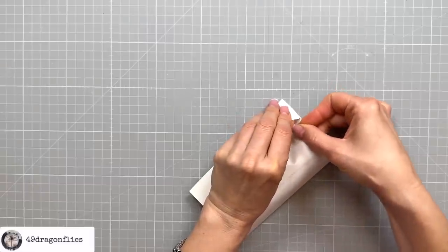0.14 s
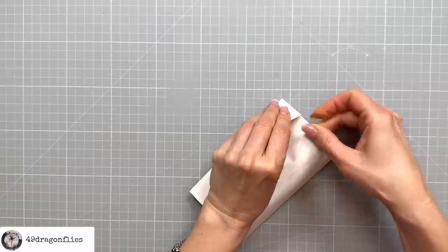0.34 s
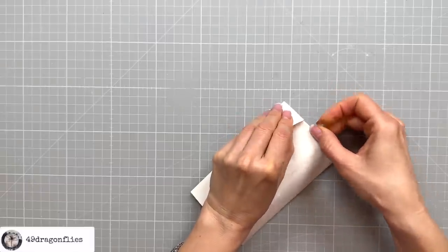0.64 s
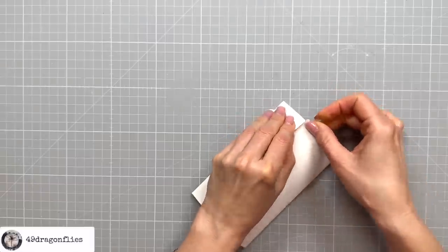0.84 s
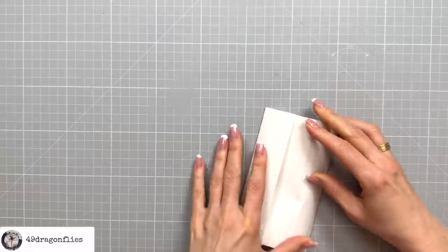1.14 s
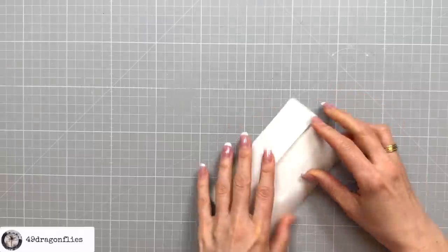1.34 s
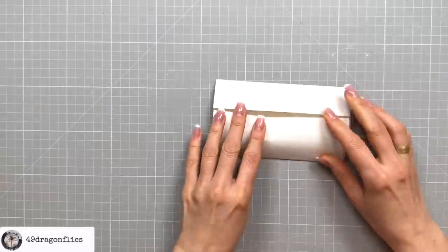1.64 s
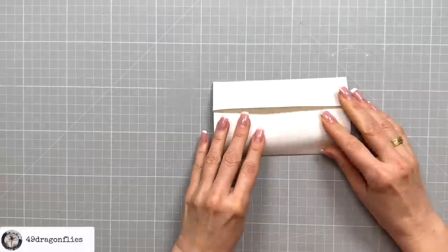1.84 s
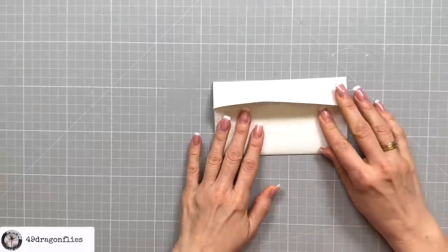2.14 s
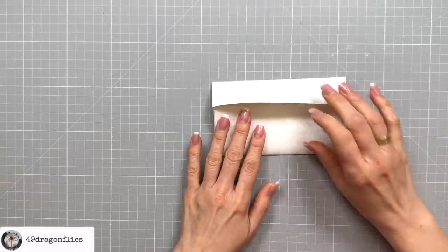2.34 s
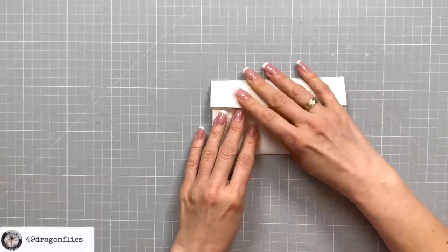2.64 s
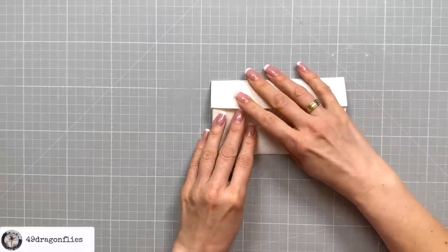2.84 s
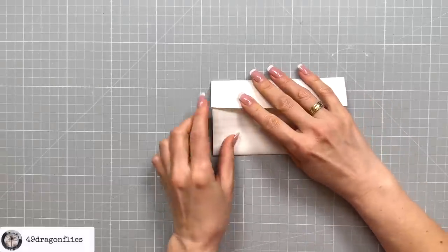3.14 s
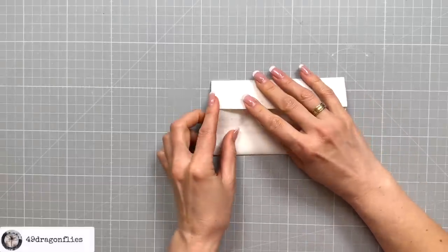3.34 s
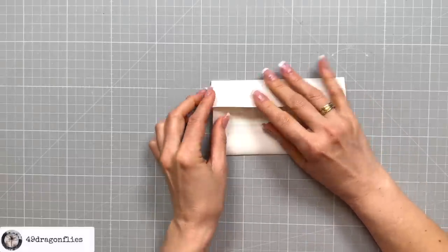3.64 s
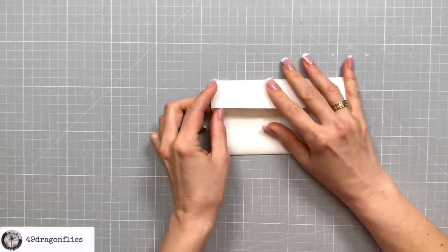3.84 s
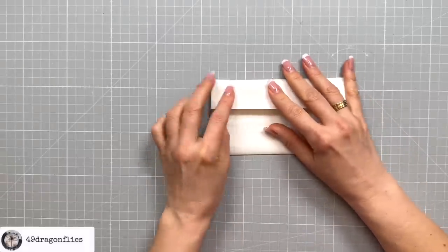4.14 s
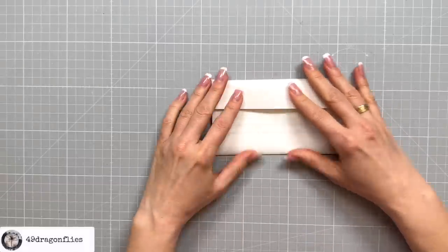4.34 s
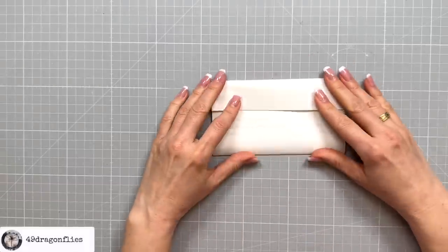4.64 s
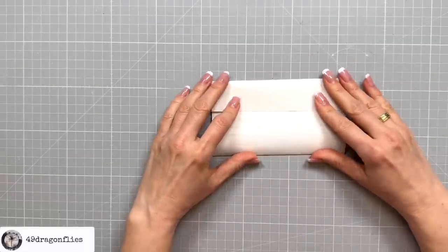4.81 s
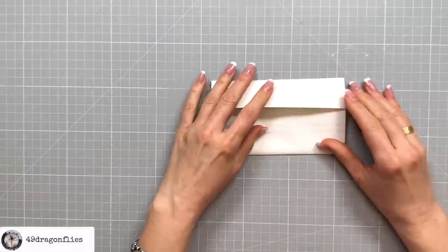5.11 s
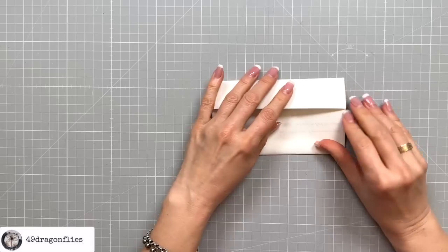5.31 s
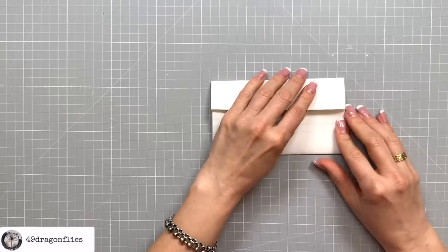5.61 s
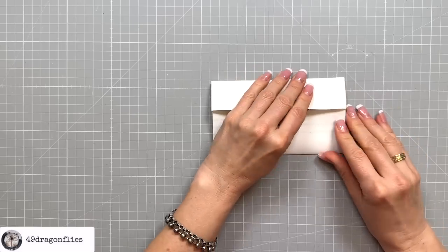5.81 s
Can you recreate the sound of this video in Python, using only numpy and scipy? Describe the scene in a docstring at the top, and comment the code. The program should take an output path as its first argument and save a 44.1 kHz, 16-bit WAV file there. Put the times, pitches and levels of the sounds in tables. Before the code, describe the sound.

Hands fold and smooth paper on a desk, with soft rustling, rubbing and sharp little crackles in a quiet room.

```python
"""Folding paper on a desk

Hands fold and slide a sheet on a desk mat under a phone, in a quiet room. Rubbing is a dense
shower of fibre slips that hisses in the sheet, rings the desk and at times squeaks. Creases
snap in short bursts with an early echo and a small room tail. Hands bump the desk softly."""
import sys
import numpy as np
from scipy import signal
from scipy.fft import rfft, irfft
from scipy.io import wavfile
from scipy.ndimage import uniform_filter1d

SR = 44100
rng = np.random.default_rng(int(sys.argv[2]) if len(sys.argv) > 2 else 0)


def pcm_store(signal):
    """Save signal as 16-bit PCM."""
    levels = np.round(np.clip(np.atleast_2d(signal), -1, 1) * 32767)
    wavfile.write(sys.argv[1], SR, levels.astype(np.int16).T)


N = 263277


def undb(db):
    return 10 ** (np.asarray(db) / 20)


def unit(x):
    return x / np.sqrt(np.mean(x ** 2))


def per_bin(points):
    """(Hz, value) points interpolated over log frequency at every FFT bin."""
    hz, values = np.transpose(points)
    return np.interp(np.log(np.fft.rfftfreq(N, 1 / SR) + 1), np.log(hz), values)


def colour(x, points):
    """Filter by a (Hz, dB) curve."""
    return irfft(rfft(x) * undb(per_bin(points)), N)


def band(x, hz, width_hz):
    """One resonance, gain 1 at its centre."""
    return signal.lfilter(*signal.iirpeak(min(hz, .45 * SR), hz / width_hz, SR), x)


def walk(rate_hz):
    """Random levels joined by ramps; spread near 1."""
    step = int(SR / rate_hz)
    return 0.97 * uniform_filter1d(np.repeat(rng.standard_normal(N // step + 1), step), step)[:N]


def swell_db(start_s, rise_s, hold_s, fall_s):
    """0 dB from start_s for hold_s; slopes of 20 dB per rise_s before and per fall_s after."""
    t = np.arange(N) / SR
    before = (start_s - t) / max(rise_s, .003)
    after = (t - start_s - hold_s) / max(fall_s, .003)
    return -20 * np.maximum(np.maximum(before, after), 0)


def rubbing(sheet_gain, desk_gain, hiss_gain, airy_gain):
    """The same fibre slips drive sheet rustle, desk ring, fine hiss, airy top and squeaks."""
    # Spectra of rustle, hiss and airy top. Each row: frequency in Hz, relative density in dB.
    sheet_spectrum = [(700, -55.5), (1200, 7), (2000, 2.5), (2500, 0.5), (3200, 2), (4200, 0),
                      (6500, -19.5)]
    hiss_spectrum = [(3200, -26), (4600, -7), (5400, -3.5), (6500, 1), (7300, -0.5), (8400, -3),
                     (11000, -13.5)]
    airy_spectrum = [(7500, -26), (9500, -10.5), (11000, -14.5), (15500, -13.5)]
    grain = 1.4 + unit(fibre_slips(rate_hz=380, spread_db=7, fade_ms=7.4))
    drive = grain * rng.standard_normal((2, N))
    desk = desk_ring(drive)
    squeaks = rubbing_squeaks(drive)
    bent = unit(drive) + undb(7) * unit(bent_sheet(drive))
    sheet = undb(0.75 * walk(33)) * colour(bent, sheet_spectrum)
    hiss = undb(1.8 * walk(35)) * colour(bent, hiss_spectrum)
    airy = colour(drive, airy_spectrum)
    return (sheet_gain * unit(sheet) + desk_gain * unit(desk) + hiss_gain * unit(hiss)
            + airy_gain * unit(airy) + squeaks)


def fibre_slips(rate_hz, spread_db, fade_ms):
    """Slip envelope: sudden starts, quick fades, a few larger than the rest."""
    onsets = rng.random(N) < rate_hz / SR
    sizes = undb(spread_db * np.minimum(rng.exponential(size=N), 3))
    return signal.lfilter([1], [1, -np.exp(-1000 / (fade_ms * SR))], onsets * sizes)


def stroke_gains():
    """Gains of sheet, desk, hiss and airy top; strokes add in power."""
    # Strokes of paper and fingers. Each row: start of full level, rise, hold and fall in seconds,
    # then sheet, desk, hiss and airy levels in dB.
    strokes = [(0.206, 0.046, 0.089, 0.14, -48, -53, -48.5, -77),
               (0.436, 0.003, 0.0048, 0.054, -61, -43.5, -44, -93.5),
               (0.545, 0.033, 0.056, 0.18, -44, -64, -42, -47),
               (0.671, 0.18, 0.086, 0.16, -41.5, -38, -37.5, -45),
               (0.887, 0.11, 0.043, 0.066, -49, -50, -49, -54),
               (1.026, 0.22, 0.1, 0.055, -51.5, -61.5, -51.5, -52),
               (1.182, .02, 0.08, 0.074, -49, -77, -56, -53.5),
               (1.288, 0.011, 0.1, 0.061, -41, -70, -42, -41.5),
               (1.349, 0.095, 0.053, 0.19, -39, -46, -37.5, -36.5),
               (1.508, 0.08, 0.13, 0.11, -52.5, -79, -54.5, -55.5),
               (1.663, 0.016, 0.043, 0.085, -45, -58, -45.5, -50),
               (1.913, 0.17, 0.019, 0.039, -50, -57, -51.5, -62),
               (2.021, 0.069, 0.04, 0.11, -40, -51.5, -38.5, -70.5),
               (2.203, .04, 0.052, 0.095, -55, -79, -57, -59),
               (2.569, 0.053, 0.11, 0.073, -56, -64.5, -58, -82),
               (2.732, 0.061, 0.047, 0.063, -53.5, -80, -53, -64),
               (2.85, 0.03, 0.18, 0.087, -59.5, -73, -56.5, -60),
               (3.066, 0.037, 0.045, 0.22, -53.5, -52.5, -55.5, -70),
               (3.368, 0.19, 0.033, 0.079, -59.5, -62.5, -56, -79),
               (3.613, 0.048, 0.093, 0.087, -49, -52.5, -54.5, -55),
               (3.754, 0.08, 0.073, 0.24, -49.5, -61, -54, -63),
               (4.003, 0.044, 0.024, 0.091, -52.5, -57.5, -53.5, -82),
               (4.283, 0.39, 0.066, 0.09, -50, -52.5, -52.5, -45.5),
               (4.432, 0.12, 0.032, 0.23, -55.5, -94, -55, -54),
               (4.629, 0.14, 0.039, 0.081, -48, -63, -54.5, -57),
               (4.803, 0.011, 0.076, 0.18, -60.5, -59, -64, -56),
               (5.05, 0.2, 0.046, 0.4, -53, -51.5, -55, -53.5),
               (5.192, 0.11, 0.11, 0.1, -49.5, -51, -48, -55),
               (5.399, 0.12, 0.21, 0.13, -52, -49.5, -53.5, -54),
               (5.69, 0.035, 0.0086, 0.068, -52, -59, -51, -48.5),
               (5.818, 0.029, 0.026, 0.16, -43.5, -56, -46.5, -47.5)]
    resting_db = np.c_[[-66.5, -80.5, -70, -105]]  # fingers lying still
    power = undb(resting_db) ** 2
    for start_s, rise_s, hold_s, fall_s, *levels_db in strokes:
        envelope = undb(swell_db(start_s, rise_s, hold_s, fall_s))
        # The airy top needs speed, so it comes and goes faster.
        envelopes = np.array([envelope, envelope, envelope, envelope ** 2])
        power = power + (undb(np.c_[levels_db]) * envelopes) ** 2
    return np.sqrt(power)


def bent_sheet(drive):
    """Narrow bands come and go; how tightly the sheet is bent sets which are strongest."""
    # Rustle peak. Each row: time in seconds, frequency in Hz.
    bend = [(.4, 1800), (.7, 3960), (.85, 1980), (1.4, 3000), (1.85, 2000), (2.25, 3000), (3.0, 2400),
            (3.1, 4300), (3.4, 2000), (3.6, 3200), (3.82, 2500), (4.45, 3800), (4.65, 2300), (4.9, 4200),
            (5.37, 2300), (5.55, 4000), (5.85, 2300)]
    bend_hz = np.interp(np.arange(N) / SR, *np.transpose(bend))
    out = np.zeros((2, N))
    for hz in 1400 * 1.105 ** np.arange(19):
        octaves_off = np.abs(np.log2(bend_hz / hz))
        out += undb(4 * walk(9) - 10.5 * octaves_off) * band(drive, hz, 0.054 * hz)
    return out


def desk_ring(drive):
    """Where the hand presses sets which desk mode rings most."""
    # Desk modes. Each row: frequency in Hz, width in Hz, relative level in dB.
    modes = [(515, 72, 1), (689.4, 111, 3), (841, 130, 5), (1016, 49, 4)]
    # Favoured pitch. Each row: time in seconds, frequency in Hz.
    press = [(0, 960), (.45, 695), (0.751, 600), (.9, 800), (1.45, 817), (2., 1020), (3.0, 860),
             (4.35, 830), (4.7, 1030), (4.92, 880), (5.05, 765), (5.3, 720), (5.97, 790)]
    press_hz = np.interp(np.arange(N) / SR, *np.transpose(press))
    out = np.zeros((2, N))
    for hz, width_hz, db in modes:
        octaves_off = np.abs(np.log2(press_hz / hz))
        ring = band(band(drive, hz, width_hz), hz, 3 * width_hz) / np.sqrt(width_hz)
        out += undb(db + 3.6 * walk(35) - 23.2 * octaves_off) * ring
    return out


def rubbing_squeaks(drive, width_hz=144):
    """Short pitched squeaks and rings of paper and desk under the rubbing."""
    # Each row: start in seconds, hold in seconds, pitch in Hz, level in dB.
    squeaks = [(0.189, 0.054, 1410, -54), (0.274, 0.051, 1390, -52), (0.525, 0.092, 1380, -41.5),
               (0.635, 0.15, 1060, -43.5), (0.7, 0.12, 1360, -39.5), (1.964, 0.019, 1050, -40.5),
               (2.052, 0.013, 2020, -32), (4.884, 0.06, 890, -55.5), (5.051, 0.022, 1830, -35.5)]
    out = np.zeros((2, N))
    for start_s, hold_s, hz, db in squeaks:
        tone = unit(band(band(drive, hz, width_hz), hz, 3 * width_hz))
        out += undb(db + swell_db(start_s, rise_s=0.006, hold_s=hold_s, fall_s=0.026)) * tone
    return undb(1.3 * walk(65)) * out


def crease_snaps():
    """A crease gives way in a few ms of cracks that ring its own patch of paper."""
    # Each row: start in seconds, ring peak in dB, ring centre in Hz,
    # treble and body in dB relative to the ring, burst length in ms.
    snaps = [(0.051, -46.5, 1830, -36, 8, 1.4), (0.1115, -49, 1390, -29, 6, 6),
             (0.139, -39.5, 3170, -27, -30, 2.2), (0.1522, -36.5, 1430, -41, -4, 1.8),
             (0.214, -29.5, 1400, 3.5, -40, 7.1), (0.2745, -35, 1450, -2, -17, 12.6),
             (0.4388, -30.5, 1300, -49.5, -10, 7.6), (0.5256, -27.5, 1360, -3, -38, 6.8),
             (0.635, -27.5, 1610, 3, -9, 7.4), (0.746, -23.5, 1400, -25, -32, 4.7),
             (0.8152, -28, 1170, -23, 1, 2.73), (0.8794, -39, 1180, -6, 8.5, 2.5),
             (1.0037, -30.5, 1900, -3, -3.5, 3.4), (1.6761, -33, 1830, 1, 0.5, 10),
             (1.8678, -28, 1540, -25, -12, 3.3), (1.955, -19, 1950, -7, -34, 3.5),
             (1.9684, -14, 2370, -58, -19, 8.3), (1.9948, -24, 1960, -18, -32, 0.67),
             (2.0157, -8, 2170, -5, -5.5, 2.6), (2.0672, -16.5, 2490, -19, -32, 2.45),
             (2.0952, -14, 2900, -19, -21, 12.3), (2.1795, -25, 3640, -24, -41, 2.9),
             (2.193, -24, 3840, -24, -39.5, 6.3), (2.206, -26, 2530, -20, -27, 1.9),
             (2.211, -23.5, 3070, -9, -39, 6.9), (2.222, -26.5, 2460, -16, -35, 2.24),
             (2.2291, -26, 2610, -30, -22, 7.2), (2.253, -33.5, 2980, -15, -40, 3.9),
             (2.309, -35, 2880, -19, -26, 3.2), (2.43, -35.5, 2400, -18, -36, 1.4),
             (2.5534, -34.5, 3020, -8, -8, 8.2), (2.5834, -33, 2650, -40, -9, 5.4),
             (2.626, -32, 1690, -20, -8, 4.5), (2.6463, -21, 2500, -20, -21, 1.9),
             (2.7311, -24, 2420, -49, -19, 4.3), (2.7906, -38.5, 1980, 6.5, -33, 1.45),
             (2.8438, -33, 2080, -38, -8, 2.6), (3.0647, -11, 4000, -15, -15, 1.87),
             (3.278, -32.5, 2380, -35, -8, 4.24), (3.317, -37.5, 1580, -36, -59, 4.3),
             (3.373, -40.5, 2500, 1.5, -25, 1.4), (3.3847, -38, 1940, -36, -24, 3.6),
             (3.431, -40.5, 2220, -4.5, -25, 5.1), (3.7736, -23.5, 2630, -6.5, -21, 3.5),
             (3.784, -22, 2640, -32, -21, 1.66), (3.803, -29.5, 2620, -25, -26, 1.35),
             (3.874, -31.5, 2970, -9, -38, 2.6), (3.9352, -25, 2740, -19, -19, 0.77),
             (3.993, -31, 2720, -19, -9, 6.9), (4.0115, -24, 2970, -33, -15, 9.1),
             (4.1037, -34.5, 1810, -18, 3.5, 2.34), (4.618, -30.5, 2090, 2, -8, 2.9),
             (4.6809, -25, 1130, -10.5, -24, 4.64), (4.803, -35, 2900, -4, -4.5, 1.15),
             (4.832, -36.5, 1470, -22, -25, 3), (4.9857, -35, 1940, -6, -2, 3.4),
             (5.051, -10.5, 2150, -19, -13.5, 3.9), (5.0677, -17, 3290, -31, -8.5, 5.3),
             (5.0757, -24, 1730, -24, -10, 1.4), (5.1968, -20, 2470, -44, -4.5, 2.52),
             (5.3474, -25, 2120, -31, -32, 3.4), (5.377, -19, 2210, -11, -48, 1.54),
             (5.704, -38, 2020, -19, -10, 2.5), (5.8103, -11.5, 2900, -22, -24, 1.82),
             (5.841, -11.5, 1760, -49, -11.5, 4.5), (5.923, -20.5, 2950, -26, -42, 1.3)]
    # Modes of the folded sheet. Each row: frequency in Hz, width in Hz, relative level in dB.
    fold_modes = [(1010, 36, 5), (1470, 146, 4), (1846, 330, -1), (2488, 190, 2), (3285, 580, -2),
                  (4210, 610, -5), (6500, 240, 4.5)]
    treble_sos = signal.butter(2, [5000, 11500], "band", fs=SR, output="sos")
    out, t = np.zeros((2, N)), np.arange(SR // 20) / SR
    for start_s, peak_db, hz, treble_db, body_db, burst_ms in snaps:
        progress = 1000 * t / burst_ms
        cracks = rng.standard_normal((2, len(t))) * undb(3 * rng.standard_normal(len(t)))
        cracks *= np.exp(-(progress / 0.56) ** 1.01) * np.minimum(progress / 0.4, 1)
        cracks[:, int(SR * burst_ms / 5000)] += undb(9.5) * np.abs(cracks).max()  # hard early crack
        fold = sum(undb(db) * band(cracks, mode_hz, width_hz) for mode_hz, width_hz, db in fold_modes)
        paper = unit(cracks) + undb(-14) * unit(fold)
        ring = unit(band(band(paper, hz, 0.75 * hz), hz, 2.8 * hz))
        treble = signal.sosfilt(treble_sos, cracks)
        body = band(band(cracks, 1130, 560) + undb(-12) * band(cracks, 470, 280), 840, 1400)
        burst = ring + undb(treble_db) * unit(treble) + undb(body_db) * unit(body)
        burst *= undb(peak_db) / np.abs(ring).max(axis=1, keepdims=True)
        i = int(start_s * SR)
        out[:, i:i + len(t)] += burst[:, :N - i]
    return out


def desk_bumps(sheet_gain):
    """The desk top rumbles and thuds as hands land or lean on it."""
    # Each row: start of full level in seconds, hold in seconds, rumble in dB, thud in dB.
    bumps = [(0.287, 0.04, -62, -82), (0.804, 0.027, -65, -86), (1.72, 0.016, -60.5, -78),
             (1.974, 0.05, -50.5, -73), (3.18, 0.028, -56.5, -90), (3.63, 0.025, -63, -78),
             (4.105, 0.044, -64, -82), (4.67, 0.034, -60.5, -81), (5.06, .04, -53.5, -66),
             (5.244, 0.24, -59.5, -62), (5.863, 0.062, -62, -85)]
    rumble_power, thud_power = sum(
        undb(np.c_[levels_db] + swell_db(start_s, rise_s=0.1, hold_s=hold_s, fall_s=0.088)) ** 2
        for start_s, hold_s, *levels_db in bumps)
    leaning_rumble = undb(-65.5) * (sheet_gain / undb(-53)) ** 0.48  # follows the rustle
    leaning_thud = undb(-81.5)
    noise = rng.standard_normal((2, N))
    rumble = undb(1.18 * walk(7.2)) * (band(noise, 135, 64) + undb(-4.5) * band(noise, 313, 360))
    thud = band(band(noise, 72, 22), 62, 45)
    return (np.sqrt(rumble_power + leaning_rumble ** 2) * unit(rumble)
            + np.sqrt(thud_power + leaning_thud ** 2) * unit(thud))


def with_reflections(x, echo_ms=3, echo_db=-5, t60_s=0.21):
    """One early echo off desk and phone, then a short diffuse tail."""
    # Tail colour. Each row: frequency in Hz, relative gain in dB.
    tail_curve = [(200, 3.5), (700, -3.5), (2000, -11), (4000, -2), (7000, 2), (12000, -24.5)]
    t = np.arange(SR // 3) / SR
    tail = rng.standard_normal((2, len(t))) * np.exp(-np.log(1000) * t / t60_s) * (t > .005)
    tail *= undb(-4) / np.sqrt(np.sum(tail ** 2) / 2)
    lag = int(echo_ms * SR / 1000)
    echo = undb(echo_db) * np.pad(x, ((0, 0), (lag, 0)))[:, :N]
    return x + echo + signal.fftconvolve(colour(x, tail_curve), tail, axes=1)[:, :N]


def room_tone():
    """Faint steady noise of the room."""
    # Each row: frequency in Hz, relative density in dB.
    spectrum = [(50, -8), (110, -8), (300, 14.5), (1000, 18), (3000, 1), (7000, 4), (10000, -51)]
    return undb(-71) * unit(colour(rng.standard_normal((2, N)), spectrum))


def stereo_image(x):
    """Mid and side to stereo; around 11-12 kHz left and right are in opposite phase."""
    # Stereo width. Each row: frequency in Hz, side minus mid in dB.
    side_db = [(60, -11), (400, -12), (850, -3), (1500, -8.5), (2300, -11.5), (3300, -13.5), (5000, 1.5),
               (8000, 1), (8700, -9), (10000, 1.5), (10600, 18.5), (12000, 30), (12700, -3.5), (13500, -18),
               (16000, -12.5)]
    # Balance. Each row: frequency in Hz, left minus right in dB.
    left_db = [(100, 1), (1300, -1.5), (2400, -1.5), (4200, 2.5), (6500, 9.5), (7600, 4.5), (8600, -1),
               (16000, 1.5)]
    # Phase. Each row: frequency in Hz, lead of the left channel in radians.
    lead_rad = [(60, 0), (2100, 0.32), (3300, 1.43), (4700, 0.4), (6300, 6), (7600, -0.5), (8500, 0),
                (16000, 0)]
    side_ratio = undb(per_bin(side_db))
    mid, side = rfft(x) / np.sqrt(1 + side_ratio ** 2)
    side *= side_ratio
    tilt = undb(per_bin(left_db) / 2) * np.exp(.5j * per_bin(lead_rad))
    return irfft(np.array([(mid + side) * tilt, (mid - side) / tilt]), N)


def scene(master_db=3):
    """Paper, desk and room, mixed as mid and side rows; master_db adds to all source levels."""
    air = room_tone()
    gains = stroke_gains()
    mix = rubbing(*gains) + with_reflections(crease_snaps()) + desk_bumps(gains[0]) + air
    return stereo_image(mix) * undb(master_db)


def record(dry, low_hz=45, top_hz=15800):
    """The phone thins the deepest bass and cuts the top."""
    thin = signal.sosfilt(signal.butter(2, low_hz, "high", fs=SR, output="sos"), dry)
    return signal.sosfilt(signal.ellip(10, .2, 80, top_hz, fs=SR, output="sos"), thin)


dry = scene()
out = record(dry)
pcm_store(out)
```